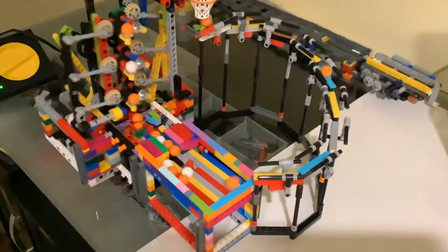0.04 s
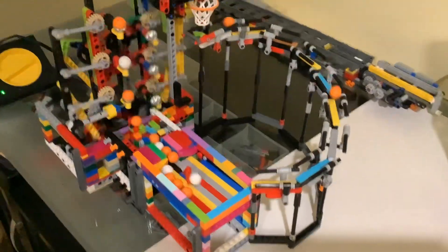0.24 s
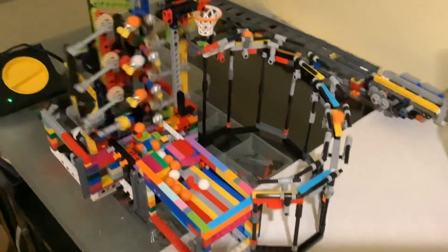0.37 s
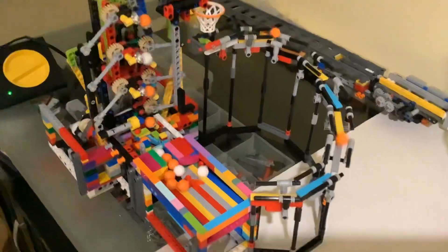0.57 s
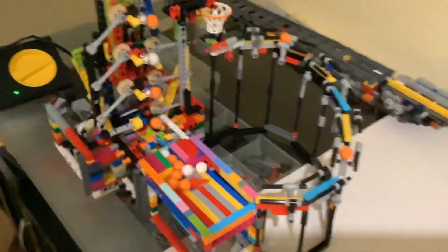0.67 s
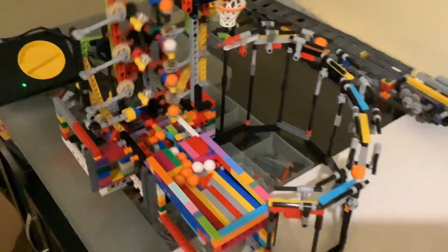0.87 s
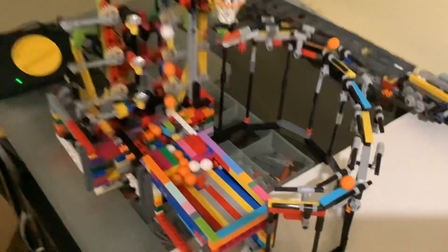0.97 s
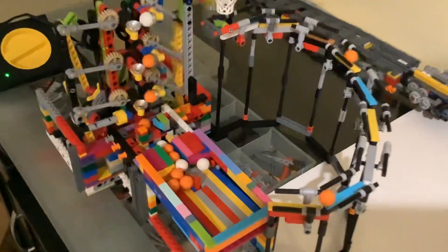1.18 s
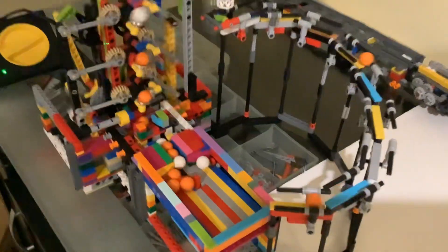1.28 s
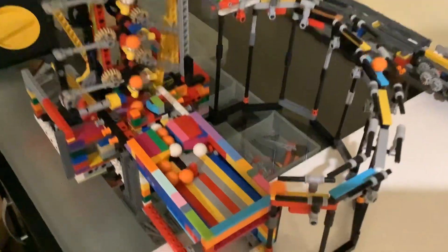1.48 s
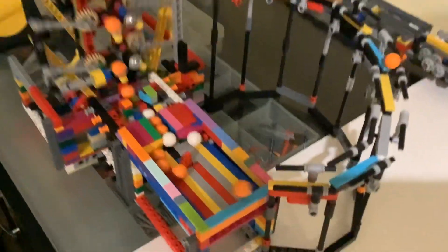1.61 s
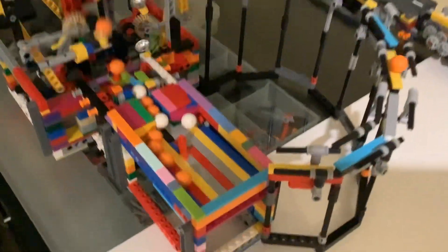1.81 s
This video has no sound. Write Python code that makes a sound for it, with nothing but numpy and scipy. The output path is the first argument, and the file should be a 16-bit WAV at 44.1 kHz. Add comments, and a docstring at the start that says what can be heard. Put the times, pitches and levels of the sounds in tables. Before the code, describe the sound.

A toy ball machine whirs and clacks, with loud thumps from handling the microphone.

```python
"""A toy ball machine of plastic bricks runs in a small room, close to a hand-held camera.
From the start its motor whines, its gears whir and rattle, and balls and levers clack on the frame.
In the first second the camera is rubbed and knocked; its low-cut filters smear each knock
into a falling thump. Then the machine is heard alone: rolling balls, grown louder,
ring the track, and the frame rings harder under the clacks."""
import sys
import numpy as np
from scipy import signal
from scipy.fft import rfft, irfft
from scipy.io import wavfile
from scipy.ndimage import uniform_filter1d

SR = 44100
rng = np.random.default_rng(int(sys.argv[2]) if len(sys.argv) > 2 else 0)


def unload_wav(signal):
    """Save mono or channel-first audio to the path in sys.argv[1] as 16-bit WAV at rate SR, clipped to [-1, 1]."""
    wavfile.write(
        sys.argv[1],
        SR,
        np.round(np.clip(np.atleast_2d(signal).T, -1, 1) * 32767).astype(np.int16),
    )


N = 81585
TIME = np.arange(N) / SR
HZ = np.fft.rfftfreq(N, 1 / SR)


def amp(db):
    """Decibels to gain."""
    return 10 ** (np.asarray(db) / 20)


def unit(x):
    """Scale to rms 1."""
    return x / np.sqrt(np.mean(x ** 2) + 1e-20)


def curve(points):
    """Value per sample from (time [s], value) points."""
    return np.interp(TIME, *np.transpose(points))


def spectrum(points):
    """Gain per bin from (frequency [Hz], level [dB]) points."""
    hz, db = np.transpose(points)
    return amp(np.interp(np.log(HZ + 1), np.log(hz + 1), db))


def shaped(x, gain):
    """Filter by a gain per bin."""
    return irfft(rfft(x) * gain, N)


def noise(gain):
    """Coloured noise, rms 1."""
    return unit(shaped(rng.standard_normal(N), gain))


def band(x, low_hz, high_hz):
    """Causal band-pass."""
    top_hz = np.clip(high_hz, low_hz + 100, SR / 2 - 100)
    return signal.sosfilt(signal.butter(2, [low_hz, top_hz], "band", fs=SR, output="sos"), x)


def wander(rate_hz):
    """Smooth random drift, rms 1."""
    return noise(np.exp(-(HZ / rate_hz) ** 2))


def decay(start_s, decay_s):
    """Step to 1, then exponential fall."""
    return (TIME >= start_s) * np.exp(-np.abs(TIME - start_s) / decay_s)


# Hand rumble spectrum: (frequency [Hz], relative level [dB])
RUMBLE_SPECTRUM = [(25, -48), (45, -15), (70, -5.5), (115, -1), (170, -12), (300, -9), (1000, -34),
                   (16000, -80)]
# Hand rumble envelope: (time [s], level [dB])
RUMBLE_ENVELOPE = [(0, -37), (.06, -52.5), (.12, -51.5), (.3, -49.5), (.55, -62), (.83, -64), (1.0, -52),
                   (1.75, -51.5), (1.85, -64)]


def rumble():
    """The hand holding the camera makes a low rumble."""
    return amp(curve(RUMBLE_ENVELOPE)) * noise(spectrum(RUMBLE_SPECTRUM))


# Track resonances: (frequency [Hz], width [Hz], relative level [dB])
TRACK_MODES = [(273, 61.5, -24.5), (466, 36, -11.5), (889, 24, -14), (2623, 73, -7.5), (4350, 160, -1.5),
               (4550, 220, -1), (4615, 71, -1.5), (4815, 150, -1.5), (5220, 96, -7)]
# Rolling envelope: (time [s], gain [dB])
ROLLING_ENVELOPE = [(0, -57), (.5, -47.5), (.85, -46), (1.1, -43), (1.45, -42.5), (1.7, -44.5), (1.85, -43)]


def rolling():
    """Unevenly rolling balls excite the track's resonances."""
    rings = sum(amp(db) * noise(1 / (1 + (2 * (HZ - hz) / width_hz) ** 2))
                for hz, width_hz, db in TRACK_MODES)
    return amp(curve(ROLLING_ENVELOPE)) * rings


# Motor speed: (time [s], whine fundamental [Hz])
MOTOR_SPEED = [(0, 717), (.09, 701), (.22, 712), (.3, 717.7), (.48, 721.2), (.62, 721), (.78, 717.3),
               (.9, 710), (1.06, 700.7), (1.17, 728), (1.27, 711), (1.38, 714.5), (1.48, 719), (1.57, 718),
               (1.66, 702), (1.76, 717), (1.85, 713)]
# Whine harmonics: (multiple, level [dB])
WHINE_HARMONICS = [(1, -49.5), (2, -57), (3, -49), (4, -56.5), (5, -45.5), (6, -50.5), (7, -51.5),
                   (9, -49.5), (11, -54.5)]


def motor(waver_share=0.00314, flutter_db=2.5):
    """Harmonics follow the motor's wavering speed; each flutters in level."""
    cycles = np.cumsum(curve(MOTOR_SPEED) * (1 + waver_share * wander(rate_hz=40))) / SR
    out = np.zeros(N)
    for multiple, db in WHINE_HARMONICS:
        flutter = amp(flutter_db * wander(rate_hz=23))
        tone = np.sin(2 * np.pi * (round(multiple) * cycles + rng.random()))
        out += amp(db) * unit(flutter * tone)
    return out


# Gear spectrum: (frequency [Hz], relative density [dB])
GEAR_SPECTRUM = [(30, -34), (200, -17.5), (300, -9.5), (480, 1), (600, 0), (900, -4), (1200, -0.5),
                 (1700, -3.5), (2200, 0), (3100, -3), (3600, 3), (4600, -1), (5800, -2.5), (6500, -1.5),
                 (8300, 1), (9700, -4), (11500, -11), (13200, -8.5), (16000, -14.5)]
# Gear envelope: (time [s], level [dB])
GEAR_ENVELOPE = [(0, -33), (.14, -36), (.28, -34), (.5, -37.5), (.68, -36.5), (.85, -35), (1.1, -37.5),
                 (1.3, -36), (1.55, -36), (1.76, -35.5), (1.85, -37.5)]


def gears(patch_db=2.8, ticks_per_s=260, tick_spread_db=5.5, rattle_db=-7):
    """Plastic teeth make a patchy whir with small random rattles."""
    cells = signal.stft(rng.standard_normal(N), nperseg=512)[2]
    patches = uniform_filter1d(rng.standard_normal(cells.shape), size=4, axis=0)  # over frequency
    patches = unit(uniform_filter1d(patches, size=10, axis=1))  # over time
    whir = signal.istft(cells * amp(patch_db * patches), nperseg=512)[1][:N]
    onsets = rng.random(N) < ticks_per_s / SR
    ticks = onsets * amp(tick_spread_db * np.minimum(rng.exponential(1, N), 3))
    rattle = signal.fftconvolve(ticks, decay(0, decay_s=0.003))[:N] * rng.standard_normal(N)
    teeth = unit(whir) + amp(rattle_db) * unit(rattle)
    return amp(curve(GEAR_ENVELOPE)) * unit(shaped(teeth, spectrum(GEAR_SPECTRUM)))


def room(x, t60_s=0.18):
    """Diffuse tail of a small room, 4 ms after the direct sound."""
    tail = (rng.standard_normal(N) * amp(-60 * TIME / t60_s) * (TIME > .004))[:SR // 2]
    return signal.fftconvolve(x, tail / np.linalg.norm(tail))[:N]


# Brick frame modes: (frequency [Hz], relative level [dB], t60 [s])
FRAME_MODES = [(290, -5, .13), (437.3, 1.5, 0.14), (479, 5, .1), (900, 4.5, 0.11), (1130, 2, 0.11),
               (1443, -1, 0.28), (1806, 7.5, 0.18), (2200, 10, 0.11), (2780, -5, .1), (3050, 8.5, 0.22),
               (4690, 16, 0.16)]


def frame(t, centre_hz, fall_db_per_octave=10.5, rise_s=0.0017):
    """The struck frame rings; modes near centre_hz are driven hardest."""
    modes = np.zeros(len(t))
    for hz, db, t60_s in FRAME_MODES:
        driven_db = db - fall_db_per_octave * abs(np.log2(hz / centre_hz))
        modes += amp(driven_db - 60 * t / t60_s) * np.sin(2 * np.pi * (hz * t + rng.random()))
    return modes * (1 - np.exp(-t / rise_s))


# Ball and lever hits: (time [s], burst level [dB], low edge [Hz], high edge [Hz], burst decay [s],
# ring [Hz], ring level [dB], frame gain [dB], frame centre [Hz])
CLACK_HITS = [(0.0632, -29, 4000, 8400, .004, 5520, -29, -59, 1505),
              (0.0783, -23, 1000, 7500, 0.0061, 2190, -40, -46, 1390),
              (0.3173, -25.5, 5560, 12000, 0.0045, 6250, -27, -66, 3000),
              (0.5833, -18, 4200, 11100, 0.0033, 4880, -26, -55, 4000),
              (0.6838, -20.5, 5450, 10600, 0.0023, 8460, -28, -55, 4000),
              (0.9308, -22.5, 3460, 11900, 0.0041, 6770, -20.5, -44, 2020),
              (.9582, -28, 4000, 9700, 0.0063, 7580, -30, -59, 2000),
              (1.0315, -26.5, 3450, 11340, 0.0038, 6880, -29, -48.5, 2970),
              (1.089, -30, 908, 6000, 0.014, 2510, -44, -40, 450),
              (1.11, -37, 1120, 3530, 0.025, 2580, -26.5, -38.5, 920),
              (1.142, -39, 900, 3000, .016, 2250, -42, -38.5, 503),
              (1.2675, -21, 3970, 10600, .004, 4870, -20.5, -44, 452.4),
              (1.3437, -25.5, 1800, 13980, 0.0024, 6650, -30, -33.5, 920),
              (1.401, -32, 3000, 13000, .003, 4400, -36, -34, 285.5),
              (1.427, -45, 1500, 6000, 0.0034, 4530, -47, -33.5, 322),
              (1.5687, -14.5, 2230, 5640, 0.0049, 5470, -32, -28.5, 727),
              (1.6528, -20.5, 1160, 4500, .004, 5240, -23.5, -35, 480),
              (1.6785, -23.5, 3000, 11070, 0.0022, 5180, -31, -42, 300),
              (1.7571, -35, 1488, 5984, 0.019, 4544, -30, -46, 2000)]


def clacks(grit_spread=0.72, ring_decay_s=0.005):
    """A ball or lever hits: a gritty burst of contacts, a short ring of the part, the frame's modes."""
    out, t = np.zeros(N), np.arange(SR // 4) / SR
    for start_s, db, low_hz, high_hz, decay_s, ring_hz, ring_db, frame_db, centre_hz in CLACK_HITS:
        grit = unit(rng.standard_normal(len(t)) * np.exp(grit_spread * rng.standard_normal(len(t))))
        burst = band(grit * np.exp(-t / decay_s), low_hz, high_hz) / np.std(band(grit, low_hz, high_hz))
        ring = np.sin(2 * np.pi * ring_hz * t) * np.exp(-t / ring_decay_s)
        clack = amp(db) * burst + amp(ring_db) * ring + amp(frame_db) * frame(t, centre_hz)
        slot = out[round(start_s * SR):][:len(t)]
        slot += clack[:len(slot)]
    return out


# Finger strokes: (time [s], length [s], friction level [dB], squeak gain [dB], tilt [dB/octave])
RUB_STROKES = [(.2490, 0.01615, -7, -11.5, -0.5), (0.926, 0.0425, -25, -56, -8)]
# Friction spectrum before tilt: (frequency [Hz], relative level [dB])
FRICTION_SPECTRUM = [(40, -24), (100, -5.5), (250, 0.5), (600, -0.5), (790, 1.5), (950, -10), (1400, -5),
                     (2500, -14.5), (5000, -17), (10000, -20), (16000, -33)]
# Camera case modes: (frequency [Hz], relative level [dB])
CASE_MODES = [(487, -0.5), (780, -1), (880, -6.5), (1136, -33), (1282, -9), (1470, -5), (1750, -12),
              (2185, -9.5), (2482, -10)]


def rubs(ramp_s=0.0019):
    """A finger drags over the camera: rough friction and a squeak of the case."""
    out = np.zeros(N)
    for start_s, length_s, db, squeak_db, tilt_db_per_octave in RUB_STROKES:
        t = TIME - start_s
        stroke = np.clip(np.minimum(t, length_s - t) / ramp_s, 0, 1)
        tilt = amp(tilt_db_per_octave * np.log2(np.maximum(HZ, 70)))
        squeak = sum(amp(mode_db) * np.sin(2 * np.pi * (hz * t + rng.random()))
                     for hz, mode_db in CASE_MODES)
        friction = shaped(rng.standard_normal(N) * stroke, unit(spectrum(FRICTION_SPECTRUM) * tilt))
        out += amp(db) * friction + amp(squeak_db) * stroke * squeak
    return out


# Camera knocks: (time [s], thump level [dB], crack level [dB], crack high edge [Hz], fizz level [dB],
# rebound delay [s], rebound gain [dB])
CAMERA_KNOCKS = [(0.1082, -26, -48, 2000, -50, .001, -7), (0.2215, -8.5, -22.5, 1740, -45, 0.00097, -1),
                 (0.2554, -8.5, -4, 4960, -12, 0.00063, -6), (0.2623, -1.5, -14, 2550, -28, .001, -6),
                 (.3990, 9.5, -7, 2420, -7.5, 0.00077, -5.5), (.4368, 6.5, -1, 2880, -15, 0.000947, -10.5),
                 (0.4562, 1.5, -9.5, 2130, -26, 0.0015, -10), (.6074, 8.5, -6.5, 2800, -8, 0.001, -20),
                 (.7130, 7.5, -4, 2360, -11.5, 0.00057, 1), (.9355, -8, -22, 1390, -47, .003, 0),
                 (0.9532, -19, -48, 1200, -50, 0.00086, -6)]
# Thump spectrum: (frequency [Hz], relative level [dB])
THUMP_SPECTRUM = [(30, -51), (50, -14.5), (70, -3.5), (100, -1.5), (150, 1.5), (300, 2), (400, -3),
                  (520, -2), (700, -10), (1000, -26.5), (2000, -74), (16000, -75)]


def knocks(fizz_decay_s=0.0012):
    """A knock on the camera: a dull push, a crack made hollow by a quick rebound, a brief fizz."""
    out, colour = np.zeros(N), spectrum(THUMP_SPECTRUM)
    colour = colour / irfft(colour, N)[0]  # pulse peak 1
    for start_s, thump_db, crack_db, high_hz, fizz_db, rebound_s, rebound_db in CAMERA_KNOCKS:
        impulse = np.exp(-2j * np.pi * HZ * start_s)
        push = irfft(colour * impulse, N)
        rebound = amp(rebound_db) * np.exp(-2j * np.pi * HZ * rebound_s)
        crack = band(irfft(impulse * (1 + rebound), N), low_hz=850, high_hz=high_hz)
        fizz_envelope = decay(start_s - fizz_decay_s, fizz_decay_s)
        fizz = band(rng.standard_normal(N) * fizz_envelope, low_hz=3200, high_hz=10200)
        out += amp(crack_db) * crack / np.abs(crack).max() + amp(fizz_db) * fizz - amp(thump_db) * push
    return out


def handling(bass_delay_s=0.0297, corner_hz=101.4):
    """The phase shift of the camera's low-cut filters delays the bass of knocks and rubs."""
    phase_rad = 2 * np.pi * bass_delay_s * corner_hz * np.arctan2(corner_hz, HZ)
    return shaped(knocks() + rubs(), np.exp(1j * phase_rad))


def scene(room_db=-6):
    """Machine plus hand on the camera, mono; only the clacks feed the room."""
    hits = clacks()
    machine = hits + amp(room_db) * room(hits) + motor() + gears() + rolling()
    return (machine + rumble() + handling())[None]


def record(dry):
    """Gain control dips after loud knocks, peaks are rounded off, and the band ends steeply."""
    threshold_db, release_db_per_s, reduction_share = -15.5, 21, 0.24
    ceiling, knee, cutoff_hz = 0.96, 8.4, 15820
    power_db = 10 * np.log10(np.abs(uniform_filter1d(dry[0] ** 2, size=400)) + 1e-12)
    release_db = TIME * release_db_per_s
    held_db = np.maximum.accumulate(power_db + release_db) - release_db
    over_db = np.maximum(held_db - threshold_db, 0)
    ducked = dry / amp(reduction_share * uniform_filter1d(over_db, size=200))
    rounded = ducked / (1 + np.abs(ducked / ceiling) ** knee) ** (1 / knee)
    low_pass = signal.firwin(511, cutoff_hz, window=("kaiser", 9), fs=SR)
    return signal.oaconvolve(rounded, low_pass[None], "same")


dry = scene()
out = record(dry)
unload_wav(out)
```